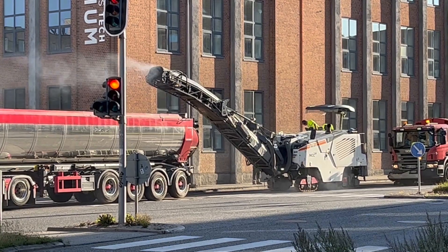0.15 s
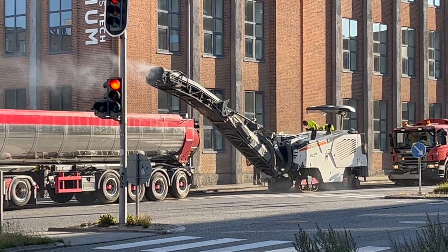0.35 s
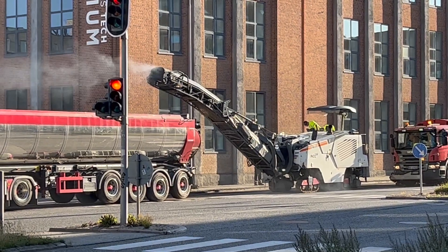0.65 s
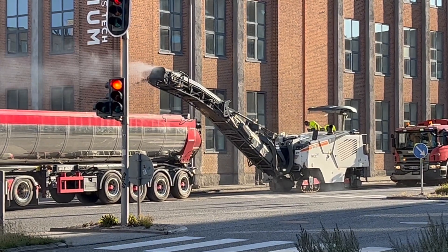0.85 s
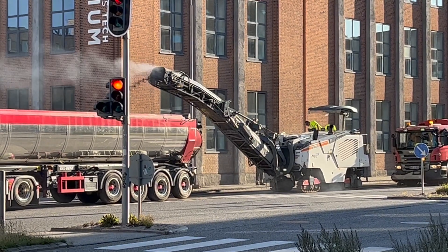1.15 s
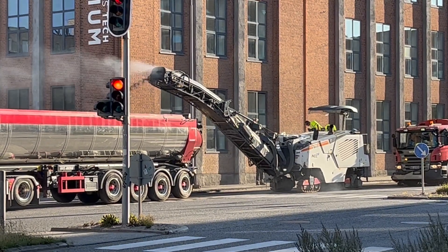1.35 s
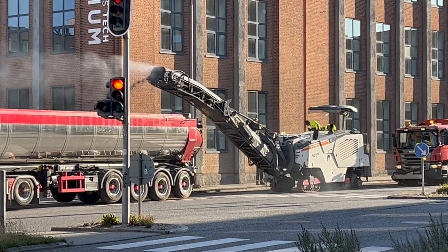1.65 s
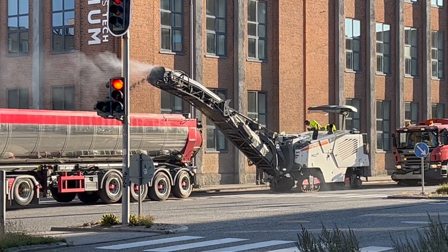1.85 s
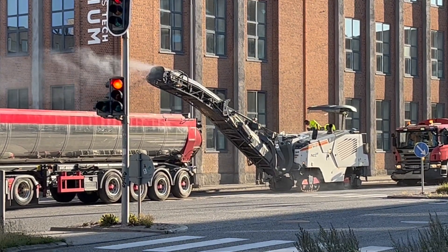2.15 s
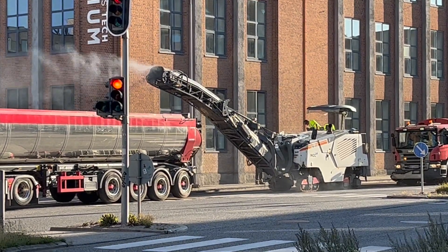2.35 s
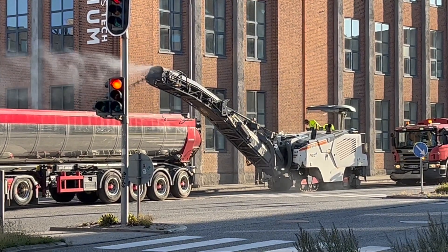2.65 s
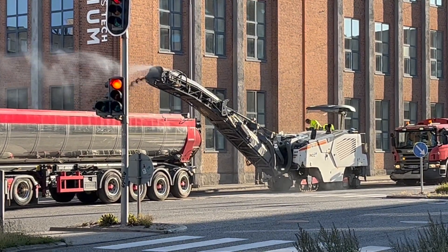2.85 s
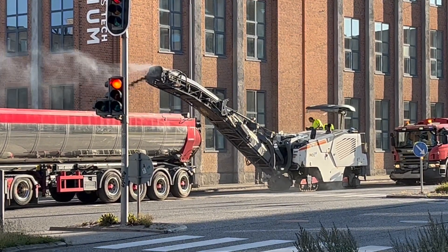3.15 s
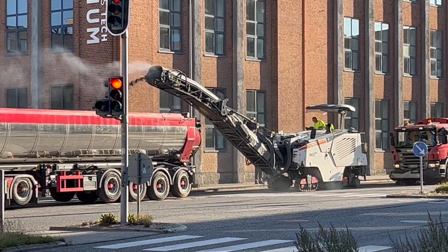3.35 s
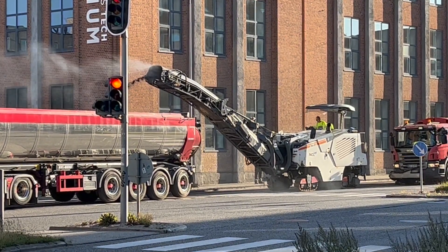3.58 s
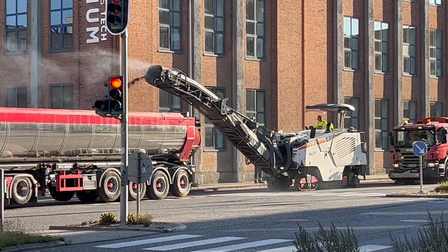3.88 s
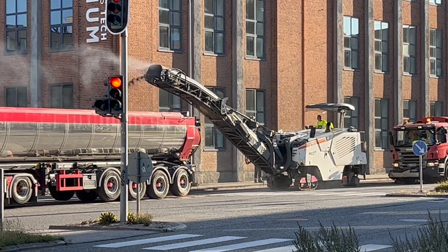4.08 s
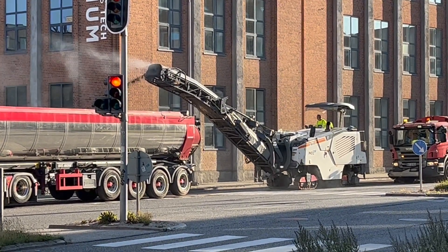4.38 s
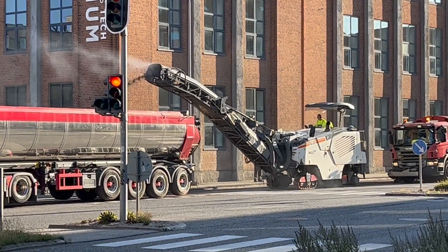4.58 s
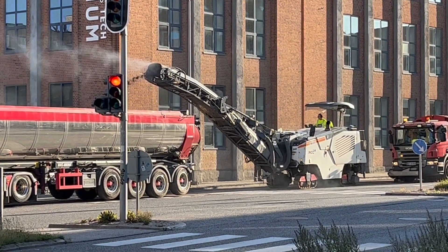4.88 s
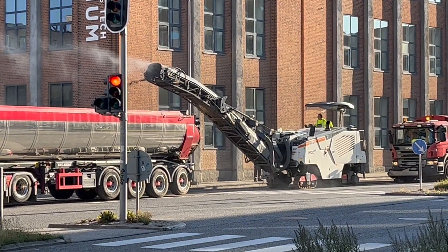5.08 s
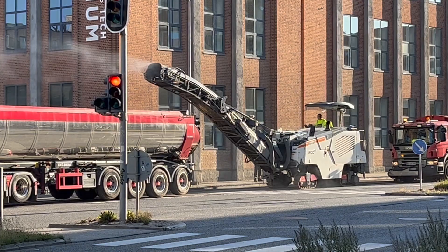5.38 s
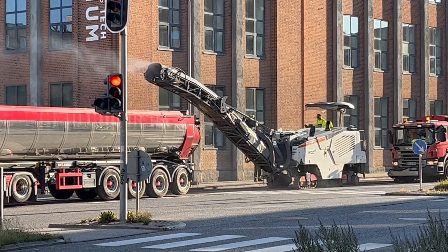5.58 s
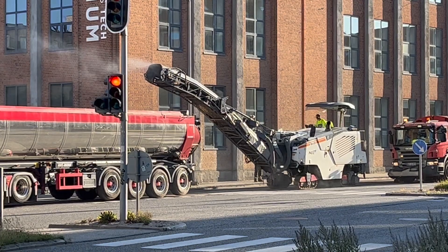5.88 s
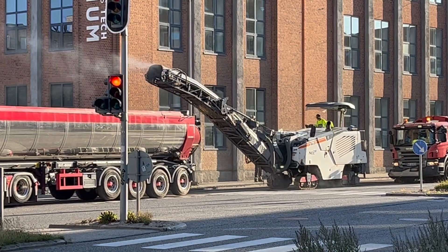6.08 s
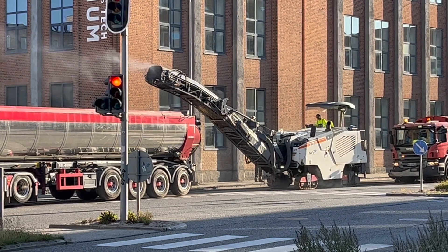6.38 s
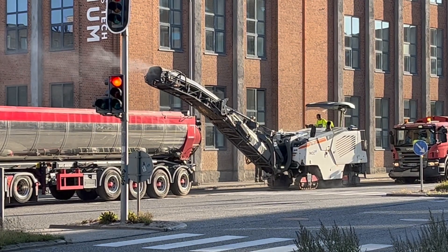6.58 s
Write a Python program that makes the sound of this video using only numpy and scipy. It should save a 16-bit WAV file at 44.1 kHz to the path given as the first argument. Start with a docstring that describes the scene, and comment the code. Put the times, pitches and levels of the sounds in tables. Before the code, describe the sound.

A dense, steady mechanical din heard in stereo from across an open street: low uneven rumble, gritty mid-range scraping of slabs, bright stony rattle, diesel hum and wavering fan and pump tones. Small clanks of chunks on metal and a brief squeak occur early. Grit hisses softly in gusts near two and five seconds, and the grinding thins toward the end without stopping.

```python
"""A road milling machine strips asphalt across a city street, loading a tipper truck, heard by two microphones.
From the start the drum rumbles and grinds, crumbs rattle up the conveyor, and diesel and pumps sound at
multiples of one crankshaft speed. Squeaks come at once and at 1.2 s, chunks strike the truck's bed from 1.1 to 2 s,
grit gusts at 2 and 5.3 s; the cut eases, most after 4.7 s. Noises are shaped impacts and hiss; hums are wavering
sines; the street is a diffuse field that differs between the microphones."""
import sys
import numpy as np
from scipy import signal
from scipy.fft import rfft, irfft
from scipy.io import wavfile
from scipy.ndimage import uniform_filter1d

SR = 44100
rng = np.random.default_rng(int(sys.argv[2]) if len(sys.argv) > 2 else 0)


def transcribe(signal):
    """Save signal, clipped to [-1, 1], as a 16-bit WAV file at the path in sys.argv[1]."""
    frames = np.atleast_2d(signal).T
    limited = np.clip(frames, -1, 1)
    pcm = np.round(limited * 32767).astype(np.int16)
    wavfile.write(sys.argv[1], SR, pcm)


N = 296787
T = np.arange(N) / SR
HZ = np.fft.rfftfreq(N, 1 / SR)


def gain_of(db):
    """Decibels to amplitude."""
    return 10 ** (np.asarray(db) / 20)


def evened(x):
    """Scales to rms 1."""
    return x / np.sqrt(np.mean(x ** 2) + 1e-20)


def read(points, hz):
    """A table's value on a log-frequency axis."""
    f, value = np.transpose(points)
    return np.interp(np.log(hz + 1), np.log(f + 1), value)


def curve(rows):
    """A timed table's value, sample by sample."""
    s, value = np.transpose(rows)
    return np.interp(T, s, value)


def drift(per_s):
    """Slow chance of rms 1, with changes up to about the given rate."""
    coarse_sr, coarse_n = 500, 4096
    lowpass = np.exp(-(np.fft.rfftfreq(coarse_n, 1 / coarse_sr) / per_s) ** 2)
    coarse = irfft(rfft(rng.standard_normal(coarse_n)) * lowpass)
    return np.interp(T, np.arange(coarse_n) / coarse_sr, evened(coarse))


def ports(hz):
    """Complex gain of the left and right microphone for sound from the machine."""
    # phase by which left leads right: (frequency [Hz], lead [rad])
    lead = [(40, 0), (100, -.11), (430, -.2), (520, -.55), (880, -1), (1040, -.25), (1250, -1.5),
            (1460, -2.2), (1630, -3.4), (1700, -5.75), (1900, -5.95), (2400, -6.28), (6600, -6.32),
            (7000, -7.6), (8200, -9.3), (8900, -9.55), (11000, -12.5), (13200, -12.7), (14500, -15.3)]
    # left minus right: (frequency [Hz], level [dB])
    balance = [(35, .1), (60, -.1), (95, -.5), (150, -1.7), (255, -2.3), (370, 3.2), (520, -.6),
               (700, -2.6), (820, 3.5), (930, -1), (1070, .8), (1300, .5), (1550, -4), (1730, -6),
               (2050, -4), (2500, -1), (3200, 0)]
    half = gain_of(read(balance, hz) / 2) * np.exp(.5j * read(lead, hz))
    return np.array([half, 1 / half])


def heard(pair, colour_db):
    """Colours two unrelated noises: one reaches both microphones, the other is the street's diffuse field."""
    # similarity of the two microphones: (frequency [Hz], likeness [0-1])
    likeness = [(35, .998), (60, .99), (110, .985), (175, .982), (260, .82), (340, .72), (520, .88),
                (780, .55), (1030, .78), (1350, .4), (1630, .45), (1720, .93), (2000, .92), (2400, .992),
                (3300, .9998), (6500, .998), (7200, .8), (8500, .995), (10000, .7), (11500, .998),
                (13000, .97), (14000, .5)]
    shared, diffuse = rfft(pair, axis=1) * gain_of(colour_db)
    same = read(likeness, HZ)
    opposite = np.array([[1], [-1]])
    both = np.sqrt(1 + same) * shared + opposite * np.sqrt(1 - same) * diffuse
    out = irfft(both * ports(HZ), N, axis=1)
    return out / out.mean(0).std()


def tone(hz, db, waver, waver_per_s):
    """A machine line; paths through moving air make its strength and phase waver."""
    wander = drift(waver_per_s) + 1j * drift(waver_per_s)
    fading = (1 + waver * wander) / np.sqrt(1 + 2 * waver ** 2)
    turns = np.cumsum(hz * np.ones(N)) / SR + rng.random()
    stereo = ports(np.mean(hz))[:, None] * fading * np.exp(2j * np.pi * turns)
    return np.sqrt(2) * gain_of(db) * stereo.real


def strikes(per_s, spread_db):
    """Two random trains of tiny impacts of uneven size."""
    size = gain_of(spread_db * np.minimum(rng.exponential(1, (2, N)), 4))
    sign = rng.choice([-1, 1], (2, N))
    return evened(size * sign * (rng.random((2, N)) < per_s / SR))


def clumped(pair, depth_db):
    """Stones come in clumps of one size, so patches of the spectrum swell and fade briefly."""
    z = signal.stft(pair, nperseg=512)[2]
    patches = uniform_filter1d(rng.standard_normal(z.shape[1:]), size=4, axis=0)
    patches = uniform_filter1d(patches, size=7, axis=1)
    return signal.istft(z * gain_of(depth_db * evened(patches)), nperseg=512)[1][:, :N]


def peaks_and_notches(bands):
    """Gain in dB at each frequency from a set of narrow peaks and notches."""
    return sum(db / (1 + (2 * (HZ - hz) / width_hz) ** 2) for hz, width_hz, db in bands)


def loaded(level, load_db):
    """Level in dB of a noise that follows a load curve and surges as the asphalt breaks unevenly."""
    surges_per_s = 4.2
    db, follow, surge_db = level
    return db + follow * load_db + surge_db * drift(surges_per_s)


def hums(load_db, follow=0.61):
    """Exhaust drone and fan hold pitch but swell and fade; other hums grow louder under load."""
    drone_hz, fan_hz = 97.0, 446.5
    # exhaust drone: (time [s], level [dB])
    drone_db = [(0, -24), (1.1, -24), (1.58, -22), (1.82, -22), (2, -23.5), (2.9, -23.5), (3.2, -24.5),
                (3.5, -29), (3.75, -22), (4.05, -25), (4.6, -22.5), (5.5, -25), (5.7, -28.5), (6.5, -22.5)]
    # cooling fan: (time [s], level [dB])
    fan_db = [(0, -34), (.25, -32), (1.1, -36.5), (1.35, -34.5), (2.3, -33), (2.7, -45), (2.93, -38),
              (3.08, -30), (3.3, -38), (3.44, -39), (3.75, -34), (5.3, -33.5), (5.5, -33.5), (6.1, -37),
              (6.35, -41), (6.55, -39)]
    # conveyor drive at the usual load: (frequency [Hz], level [dB])
    belt_line = (131.25, -28.5)
    # truck and lesser drives at the usual load: (frequency [Hz], level [dB])
    lesser_lines = [(40.4, -33.5), (81.2, -30.5), (89.1, -36), (121.5, -42), (145.3, -39), (203.3, -40),
                    (304.3, -45), (332.5, -47), (383, -47), (403, -46), (477.5, -51), (594, -54),
                    (608.6, -47.5), (892.7, -58)]
    drone = tone(drone_hz, curve(drone_db), waver=0.086, waver_per_s=17)
    fan = tone(fan_hz, curve(fan_db), waver=0.26, waver_per_s=8.0)
    belt = tone(*belt_line, waver=0.22, waver_per_s=1.46)
    lesser = sum(tone(hz, db, waver=0.23, waver_per_s=2.4) for hz, db in lesser_lines)
    return drone + fan + (belt + lesser) * gain_of(follow * load_db)


def engine(crank_hz, whine_db, load_db, follow=0.56):
    """Diesel orders swell with the load; second firing harmonic and pump whine follow level curves; one shaft."""
    # diesel and its gears at the usual load: (multiple of crankshaft speed [-], level [dB])
    diesel_orders = [(1.5, -36), (2, -34.5), (2.5, -36.5), (3, -34.5), (4, -37.5), (5, -37), (5.5, -42.5),
                     (6.5, -48), (7, -46), (7.5, -42.5), (8, -40.5), (10, -48), (11, -52), (12, -45.5),
                     (12.5, -47.5), (14, -53), (15, -45.5), (15.5, -47.5), (16, -50.5), (17, -47),
                     (20, -51), (29, -51.5)]
    # hydraulic pumps: (multiple of crankshaft speed [-], level against the whine [dB])
    pump_orders = [(18, -1), (36, -9), (54, -1), (72, -14), (81, -12.5), (108, -19), (125, -21.5)]
    # second firing harmonic near 206 Hz, swelling and fading as it beats with a nearby hum: (time [s], level [dB])
    harmonic_db = [(0, -39), (.9, -34.5), (1.6, -47), (2.15, -32.5), (2.55, -36), (2.8, -27.5), (3.2, -44),
                   (3.8, -32), (4.4, -37), (4.9, -32), (5.4, -40.5), (6.73, -46)]
    harmonic_order = 6
    diesel = sum(tone(order * crank_hz, db + follow * load_db, waver=0.53, waver_per_s=3.65)
                 for order, db in diesel_orders)
    harmonic = tone(harmonic_order * crank_hz, curve(harmonic_db), waver=0.2, waver_per_s=5.7)
    pumps = sum(tone(order * crank_hz, whine_db + db, waver=0.13, waver_per_s=7.9)
                for order, db in pump_orders)
    return diesel + harmonic + pumps


def squeaks():
    """Metal rubs on metal: each high tone holds for a moment and dies."""
    # brief squeaks: (start [s], hold [s], frequency [Hz], level during hold [dB])
    squeak_rows = [(0, .065, 6895, -53), (.072, .025, 10300, -65), (.08, .03, 4750, -52),
                   (1.21, .02, 5900, -54)]
    fade_db_per_s = 700
    out = 0
    for s, hold_s, hz, db in squeak_rows:
        level_db = db - fade_db_per_s * np.maximum(T - s - hold_s, 0)
        out = out + (T >= s) * tone(hz, level_db, waver=0.27, waver_per_s=60)
    return out


def chunks():
    """Larger chunks strike the truck's bed: each a noisy crack, a short ring and a faint tail from the street."""
    # (time [s], crack level [dB], ring and crack centre [Hz], ring level [dB], ring t60 [s])
    chunk_rows = [(1.069, -45, 5500, -52, .02), (1.075, -42, 3400, -50, .02), (1.245, -38, 3400, -48, .03),
                  (1.248, -38.5, 4280, -35, .08), (1.946, -38, 5200, -48, .03),
                  (1.948, -36, 3700, -43, .04)]
    # crack: (t60 [s], street tail t60 [s], tail against crack [dB], spectral spread [octaves])
    crack_t60, tail_t60, tail_db, octaves = (.035, .14, -13, .3)
    rise_s = .0004
    out, age, bins = np.zeros(N), np.arange(8192) / SR, np.fft.rfftfreq(8192, 1 / SR)
    for s, db, hz, ring_db, t60 in chunk_rows:
        band = np.exp(-(np.log2((bins + 1) / hz) / octaves) ** 2)
        shards = evened(irfft(rfft(rng.choice([-1., 1.], len(age))) * band))
        crack, ring, tail = (np.exp(-np.log(1000) * age / decay) for decay in (crack_t60, t60, tail_t60))
        fade = crack + gain_of(tail_db) * tail
        # same energy for every random draw
        burst = shards * fade * np.linalg.norm(fade) / np.linalg.norm(shards * fade)
        hit = gain_of(db) * burst + gain_of(ring_db) * ring * np.sin(2 * np.pi * hz * age)
        out[round(s * SR):][:len(age)] += (1 - np.exp(-age / rise_s)) * hit
    return out


def spray(load_db):
    """Fine grit hisses off the end of the belt, now and then in a gust."""
    # hiss colour: (frequency [Hz], relative density [dB per Hz])
    spray_colour = [(3000, 4), (7000, -11), (9500, 12), (11200, 5), (13000, 4), (14400, -1.5)]
    # (level at the usual load [dB], follow [dB per dB of load], surges [dB rms])
    spray_level = (-63.5, 1.1, .4)
    # gusts: (peak time [s], half length to 1/e of the lift [s], lift [dB])
    gusts = [(2.02, .15, 2), (5.33, .15, 4)]
    hiss = heard(clumped(rng.standard_normal((2, N)), depth_db=1.0), read(spray_colour, HZ))
    gust_db = sum(db * np.exp(-((T - s) / length_s) ** 2) for s, length_s, db in gusts)
    return hiss * gain_of(loaded(spray_level, load_db) + gust_db)


def rubs(rough=0.91):
    """Slabs and stones rub on hood and conveyor: each swells and fades as a rough tone, a groan or a rasp."""
    # (peak time [s], half length to 1/e [s], resonance [Hz], width as waver rate [Hz], level at peak [dB])
    rub_rows = [(.19, 0.12, 385, 50, -30.5), (.27, 0.23, 2460, 90, -43), (.43, 0.087, 3080, 170, -45),
                (.68, .06, 720, 45, -34), (.71, .06, 3000, 150, -46), (.88, 0.058, 255.6, 35, -27),
                (.98, .06, 672, 40, -34), (1.11, .07, 380, 35, -33), (1.42, .04, 3050, 170, -45),
                (1.53, .06, 400, 45, -34), (1.75, .07, 3000, 170, -43.5), (2, .09, 2980, 170, -44),
                (3.32, .12, 700, 35, -43), (3.85, 0.36, 5170, 200, -57), (5.315, .07, 640, 60, -35),
                (5.66, .08, 2780, 240, -46), (6.24, 0.037, 560, 35, -32), (6.25, .06, 1095, 200, -42.5)]
    return sum(np.exp(-((T - s) / length_s) ** 2) * tone(hz, db, waver=rough, waver_per_s=width_hz)
               for s, length_s, hz, width_hz, db in rub_rows)


def scrape(patchy_db=1.0):
    """Broken slabs scrape along the hood: dense impacts, coloured and patchy."""
    # (frequency [Hz], relative density [dB per Hz])
    scrape_colour = [(400, -16.5), (630, 6.5), (760, 2.5), (840, 0.5), (1030, 4.5), (1180, -0.5), (1400, 3),
                     (1560, 2), (1640, -8), (3000, -70)]
    # (usual level [dB], follow [dB per dB of scraping], surges [dB rms])
    scrape_level = (-35, 0.71, .25)
    # strength against the usual: (time [s], level [dB])
    scraping_db = [(0, 3), (1.3, 1.9), (2.1, 1.5), (3.3, 0), (4.5, -1.7), (5.05, -1.5), (5.35, -2),
                   (5.8, -3.5), (6.4, -1), (6.73, -4)]
    slabs = clumped(strikes(per_s=4000, spread_db=1.64), patchy_db)
    return heard(slabs, read(scrape_colour, HZ)) * gain_of(loaded(scrape_level, curve(scraping_db)))


def pings(per_s, low_hz, high_hz, t60, bunching):
    """Two trains of stones that come in bunches, each ringing briefly at a pitch of its own."""
    out, age = np.zeros((2, N + 2048)), np.arange(2048) / SR
    busy = np.cumsum(np.exp(bunching * drift(18)))
    when, pitch, size, phase, side = rng.random((int(per_s * N / SR), 5)).T
    starts = np.searchsorted(busy, when * busy[-1])
    fade = np.exp(-np.log(1000) * age / t60)
    pitch_hz = low_hz + (high_hz - low_hz) * pitch
    for at, hz, strength, turn, train in zip(starts, pitch_hz, size, phase, side):
        out[int(2 * train), at:at + len(age)] += strength * fade * np.sin(2 * np.pi * (hz * age + turn))
    return evened(out[:, :N])


def conveyor(flow_db, crank_hz, knock_depth=0.065, patchy_db=0.5, ring_db=-6):
    """Crumbs rattle and ping on steel, mixed with diesel knock at three firings a turn."""
    # (frequency [Hz], relative density [dB per Hz])
    rattle_colour = [(900, -48), (1600, -3.5), (1750, 0), (1960, -1), (2150, 1.5), (2550, -8), (2800, -3.5),
                     (3100, -8.5), (3600, -11), (4000, -11.5), (4550, -17.5), (6500, -20.5), (8000, -24.5),
                     (11000, -97)]
    # narrow peaks and notches of drum housing and conveyor: (frequency [Hz], width [Hz], gain [dB, negative cuts])
    panels = [(1640, 15, -11), (1664, 36, 9.5), (1716, 58, 5), (1850, 63, 3.5), (2498, 82, 6),
              (2673, 110, 4), (3326, 280, 4), (4950, 850, 3.5)]
    # (level at the usual flow [dB], follow [dB per dB of flow], surges [dB rms])
    rattle_level = (-35.5, 0.84, 0.41)
    firing = np.cos(2 * np.pi * 3 * np.cumsum(crank_hz) / SR)
    knock = 2.46 * rng.standard_normal((2, N)) * (1 + knock_depth * firing)
    crumbs = strikes(per_s=3500, spread_db=1.0) + knock
    stones = gain_of(ring_db) * pings(700, low_hz=2702, high_hz=7540, t60=0.13, bunching=.3)
    rattle = heard(clumped(crumbs + stones, patchy_db), read(rattle_colour, HZ) + peaks_and_notches(panels))
    return rattle * gain_of(loaded(rattle_level, flow_db))


def brightened(x):
    """Lifts or lowers the treble by its level curve."""
    # treble gain: (time [s], level [dB])
    treble_db = [(0, 0.9), (1.1, 0.8), (2.2, 0), (3.2, 0), (4.3, 0), (5.3, -.2), (5.85, -2), (6.3, -0.9),
                 (6.73, -1.7)]
    treble_hz = 3400
    highpass = signal.butter(2, treble_hz, "high", fs=SR, output="sos")
    treble = signal.sosfiltfilt(highpass, x)
    return x + treble * (gain_of(curve(treble_db)) - 1)


def drum(load_db):
    """Picks tear the asphalt: dense blows make low and body rumble, and crushed stone grinds under the hood."""
    # colours of low rumble, body rumble and grind: (frequency [Hz], relative density [dB per Hz])
    low_colour = [(18, -40), (31, -26), (42, -20), (47, 2), (60, -1.5), (66, -3.5), (76, 1.5), (90, 3.5),
                  (104, -6), (115, -20), (200, -64)]
    rumble_colour = [(70, -24), (112, -8.5), (140, -6.5), (165, -7.5), (187, -5.5), (220, -10), (265, -9.5),
                     (310, -25), (420, -47), (800, -88)]
    grind_colour = [(130, -15), (270, -4.5), (340, -1), (400, 0.5), (520, -0.5), (600, -5.5), (720, -13.5),
                    (900, -24.5), (1680, -50), (3000, -82)]
    # (usual level [dB], follow [dB per dB of swell or load], surges [dB rms])
    low_level = (-24, 0.67, 0.17)
    rumble_level = (-27, 0.81, 0.27)
    grind_level = (-30, 1.25, 0.33)
    # uneven swell of the low rumble: (time [s], level [dB])
    swell_db = [(0, -1), (.3, 6.5), (.6, -1), (1.4, 3), (2.15, 1), (2.6, 2), (3.2, -6), (3.5, 1.5),
                (4, -1.5), (4.4, 1.5), (5.1, -4.5), (5.8, 2), (6.25, 1.5), (6.73, -8)]
    # narrow peaks and notches of the hood: (frequency [Hz], width [Hz], gain [dB, negative cuts])
    hood = [(336, 21, 0), (412, 10, 2.5), (523, 5.9, 4.5), (645, 26, -3.5)]
    low_rumble = heard(strikes(per_s=900, spread_db=1.2), read(low_colour, HZ))
    low_rumble = low_rumble * gain_of(loaded(low_level, curve(swell_db)))
    rumble = heard(strikes(per_s=2500, spread_db=1.54), read(rumble_colour, HZ))
    rumble = rumble * gain_of(loaded(rumble_level, load_db))
    stones = clumped(strikes(per_s=6000, spread_db=2.5), depth_db=0.5)
    grind = heard(stones, read(grind_colour, HZ) + peaks_and_notches(hood))
    grind = grind * gain_of(loaded(grind_level, load_db))
    return low_rumble + rumble + grind


def scene(clatter_db=0.33, clatter_per_s=35):
    """The whole machine at work; broken asphalt moves in quick spurts that scrape and rattle together."""
    # crankshaft speed: (time [s], speed [turns per s])
    crank_rows = [(0, 34.2), (.8, 34.26), (1.2, 34.63), (1.5, 34.44), (2.5, 34.37), (3.15, 34.15),
                  (3.85, 34.56), (4.75, 34.33), (5.1, 34.46), (5.7, 34.35), (6.2, 33.97), (6.73, 34.1)]
    # hydraulic pump whine: (time [s], level [dB])
    whine_rows = [(0, -47), (1.1, -45.5), (1.6, -40), (2.3, -41), (2.85, -46), (3.4, -40.5), (4.3, -44.5),
                  (5, -47), (5.55, -43), (6.73, -41.5)]
    # strength of the cut against the usual load: (time [s], level [dB])
    load_rows = [(0, 2), (1.4, 1.5), (2.6, 0.8), (4.7, 0.2), (5.6, -2.5), (6.73, -1.8)]
    # crumbs up the conveyor against the usual flow: (time [s], level [dB])
    flow_rows = [(0, 2), (.7, 0.4), (2.2, 1.7), (3.7, -0.5), (4.7, -.7), (5.1, -2), (5.9, -1), (6.5, 0)]
    hunt_hz, hunt_per_s = .025, 6  # the governor hunts slightly: rms turns per s, changes per s
    crank_hz, whine_db, load_db, flow_db = map(curve, (crank_rows, whine_rows, load_rows, flow_rows))
    crank_hz = crank_hz + hunt_hz * drift(hunt_per_s)
    machinery = engine(crank_hz, whine_db, load_db) + hums(load_db) + squeaks()
    spurts = gain_of(clatter_db * drift(clatter_per_s))
    debris = (scrape() + brightened(conveyor(flow_db, crank_hz))) * spurts
    return machinery + drum(load_db) + debris + rubs() + spray(load_db) + chunks()


def record(dry):
    """The recorder's band limit: a steep linear-phase low-pass."""
    edge_hz = 14450
    lowpass = signal.firwin(511, edge_hz, window=("kaiser", 9), fs=SR)
    return signal.oaconvolve(dry, lowpass[None], "same", axes=1)


dry = scene()
out = record(dry)
transcribe(out)
```